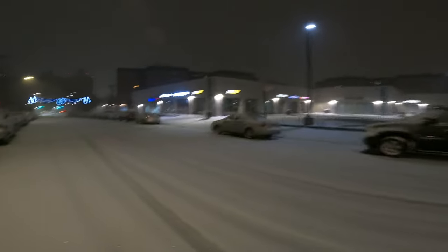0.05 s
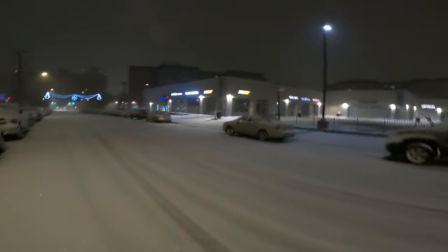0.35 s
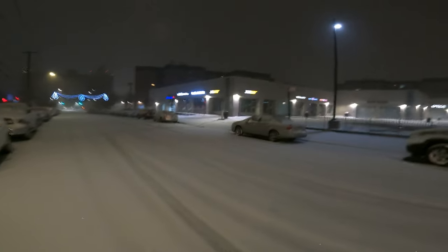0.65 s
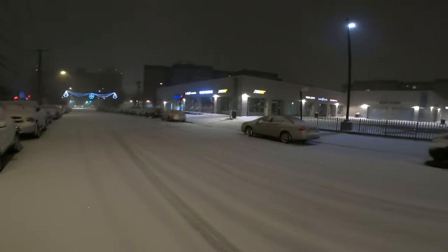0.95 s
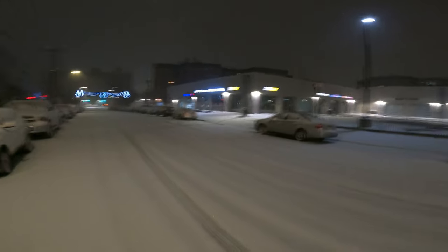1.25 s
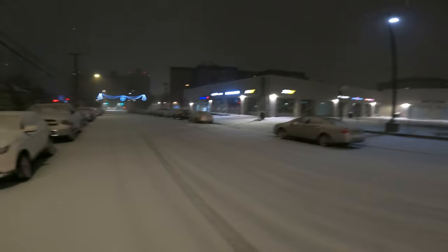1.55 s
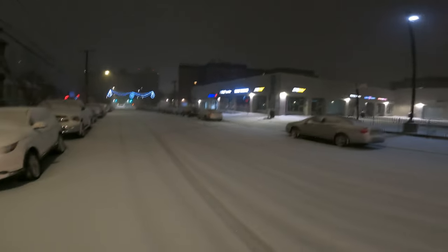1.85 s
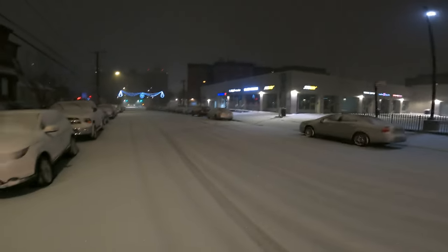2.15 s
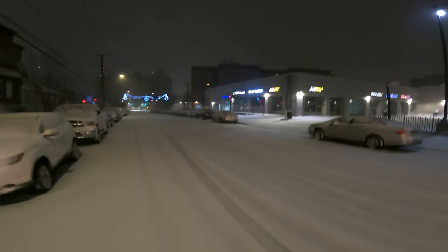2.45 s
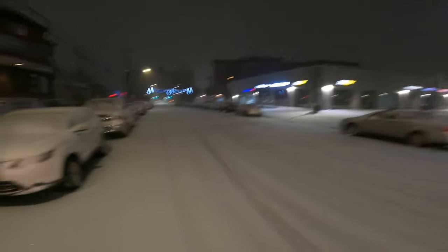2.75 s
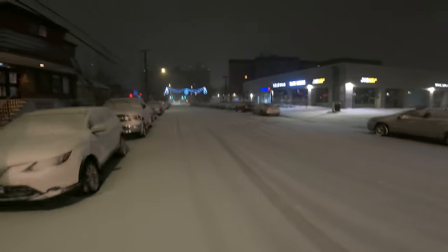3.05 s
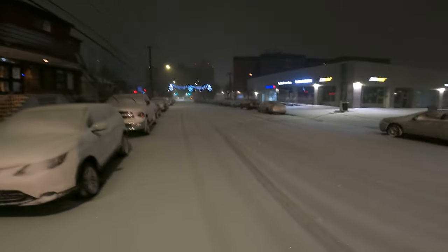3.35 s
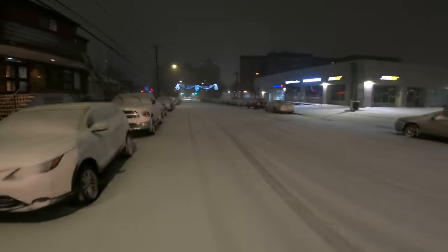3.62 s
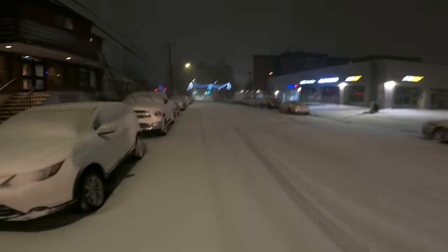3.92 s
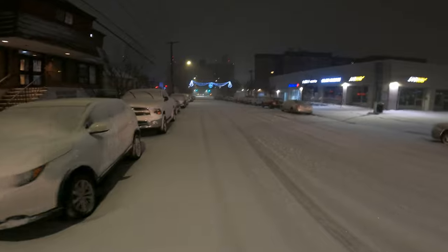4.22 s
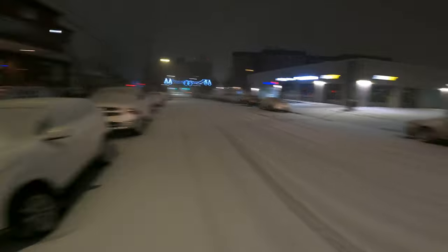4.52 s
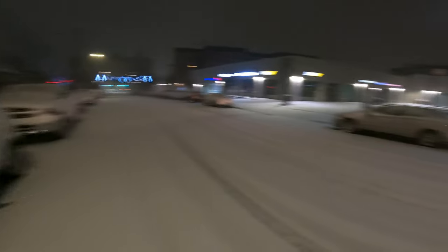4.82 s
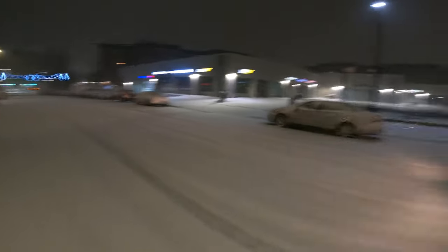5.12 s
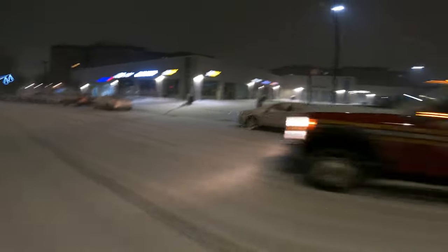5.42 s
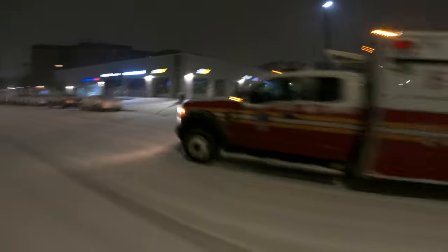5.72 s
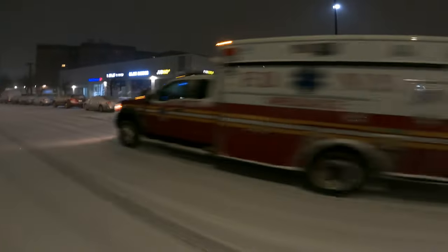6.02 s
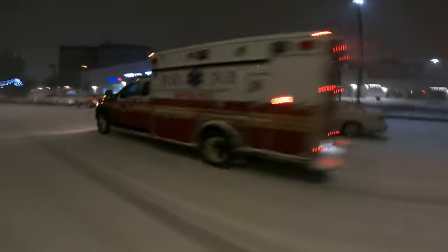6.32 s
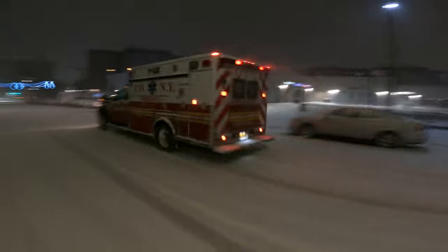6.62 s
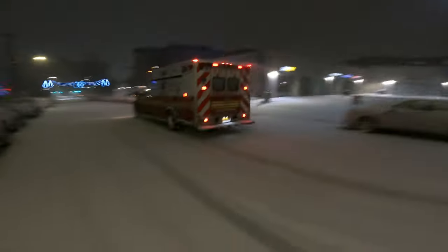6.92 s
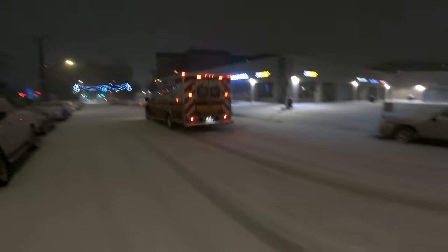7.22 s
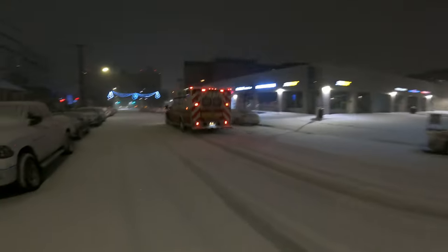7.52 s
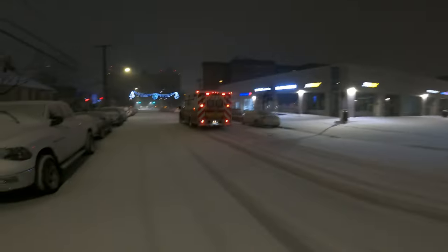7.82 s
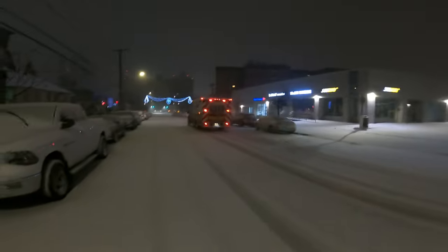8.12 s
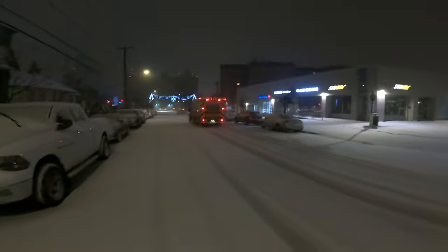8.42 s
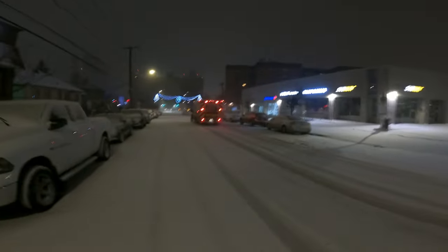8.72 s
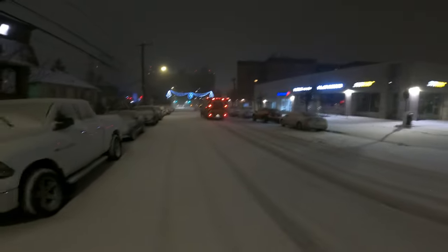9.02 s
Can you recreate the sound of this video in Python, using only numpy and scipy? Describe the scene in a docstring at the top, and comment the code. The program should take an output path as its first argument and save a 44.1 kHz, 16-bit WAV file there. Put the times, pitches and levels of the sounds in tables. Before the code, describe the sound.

An ambulance approaches along a snow-covered street, its diesel drone distant at first while the hand-held microphone is knocked and shifted. Engine hum, metallic rattle and the crunching hiss of tyres on snow build to a close pass, with a faint high whine. The sound then dulls and recedes, the exhaust booming a few more times. A low rumble of wind on the microphone runs throughout.

```python
"""A diesel engine drones in the distance, over a low rumble of air. It is an ambulance, which drives up
a snowy street, passes close to a hand-held camera and pulls away. Its firing cylinders make the exhaust
drone and the metal rattle, fan blades hum, a thin high whine flutters and the tyres crush the snow.
Before it arrives the camera is knocked and shifted in the hand, with dull bumps and small ticks."""
import sys
import numpy as np
from scipy import signal
from scipy.fft import rfft, irfft, next_fast_len
from scipy.io import wavfile
from scipy.ndimage import uniform_filter1d, map_coordinates

SR = 44100
rng = np.random.default_rng(int(sys.argv[2]) if len(sys.argv) > 2 else 0)


def dump(signal):
    """Clip the signal to [-1, 1] and save it as 16-bit WAV at the path in sys.argv[1]."""
    limited = np.clip(np.atleast_2d(signal).T, -1, 1)
    pcm = np.round(limited * 32767).astype(np.int16)
    wavfile.write(sys.argv[1], SR, pcm)


N = 408366

# Each _PASS table says how one sound drives by: (time alongside [s], level then [dB],
# closest distance [m], loss each time the distance doubles [dB], boost towards the rear [dB])
TONE_PASS = (5.85, -27, 5.2, 10.5, .3)
OCTAVE_PASS = (6, -37, 1, .6, 1.2)
GROWL_PASS = (5.4, -41, 5.5, 12.5, -2.5)
# the engine speeds up as it nears and eases off alongside (time [s], firing rate [Hz])
FIRING_RATE = [(0, 87), (.35, 81), (.7, 79), (1.5, 89), (2.3, 85.7), (3.7, 92.5), (4.2, 93.5), (4.8, 96.3),
               (5.45, 95.5), (6.25, 80.5), (7.05, 80), (8.2, 78.5), (9.26, 81.5)]
# the higher tones of the growl (multiple of the firing rate, level [dB])
GROWL_TONES = [(4, 0), (5, -5.5), (6, -7.5), (7, -4.5), (8, -10), (9, -11)]
# the exhaust note and its octave boom (time [s], level [dB], length [s])
TONE_BOOMS = [(1.4, -38.5, .1), (2.58, -33, .08), (4.83, -31, .07), (5.12, -29.5, .08), (5.7, -36, .05),
              (6.16, -30, .09), (6.6, -35, .15), (6.96, -31, .11), (7.92, -31, .07), (8.18, -24, .15),
              (8.55, -28, .14), (8.8, -28.5, .1)]
OCTAVE_BOOMS = [(.3, -49, .25), (1, -46, .3), (2.25, -40.5, .13), (3.55, -43, .16), (6.4, -39, .12),
                (6.9, -43, .25), (7.85, -37, .2), (8.65, -33, .19), (9.05, -42, .15)]
# the deep bass and the octave dip briefly (time [s], depth [dB], length [s])
BASS_DIPS = [(4.32, 3.5, 0.089), (7.71, 7, 0.053), (9, 1, 0.024)]
OCTAVE_DIPS = [(5.9, 8, 0.29)]
# the nose comes out into the open (time [s], loss while hidden [dB], fade [s])
NOSE_CLEARS = (4.76, 4.34, 0.049)
def exhaust(firing):
    """Firing cylinders make a low note, its octave and a growl; uneven firing adds weak extra tones."""
    def overtone(multiple):
        return amp(2.1 * wobble(8)) * np.sin(multiple * firing + rng.uniform(0, 2 * np.pi))
    tone_gain = (passing(*TONE_PASS) * screened(*NOSE_CLEARS) + swells(TONE_BOOMS)) * dips(BASS_DIPS)
    tone = tone_gain * amp(.5 * wobble(4.5)) * np.sin(firing)
    octave = amp(.78 * wobble(5.5)) * np.sin(2 * firing)
    uneven = amp(-21.5) * sum(overtone(k) for k in (1.5, 2.5, 3))
    drone = (passing(*OCTAVE_PASS) + swells(OCTAVE_BOOMS)) * dips(OCTAVE_DIPS) * (octave + uneven)
    growl = passing(*GROWL_PASS) * sum(amp(db) * overtone(k) for k, db in GROWL_TONES)
    return np.sqrt(2) * (tone + drone + growl)


# the tone colour of each tyre noise (frequency [Hz], level [dB])
ROAR_FRONT = [(180, -22.5), (300, -3.5), (400, -1.5), (520, -6), (680, -2.5), (900, -9.5), (1200, -10.5),
              (1550, -11), (1900, -23), (3000, -27.5)]
ROAR_REAR = [(180, -22.5), (300, -13), (400, -11), (520, 1), (700, 3.5), (950, 2), (1200, -1.5),
             (1550, -9.5), (1900, -16), (3000, -41)]
ROAR_FAR = [(180, -22), (300, -8.5), (360, 4.5), (500, 0.5), (680, -1.5), (850, -6), (1080, -4.5),
            (1400, -8), (1700, -28), (3000, -41)]
HISS_FRONT = [(940, -30), (1600, -4.5), (2050, -4), (2410, -8), (2720, -6), (3020, -10.5), (3380, -14.5),
              (5280, -20), (5980, -25), (6890, -25.5), (11300, -42.5), (13100, -44), (15400, -57)]
HISS_REAR = [(940, -21.5), (1600, -2.5), (1780, 0), (2030, -4.5), (2500, -4.5), (4460, -13), (5920, -20.5),
             (7160, -22), (8020, -24.5), (10200, -40), (11500, -42.5), (13000, -40.5), (14400, -47),
             (15400, -55.5)]
DRUMMING = [(200, -26), (320, -1), (450, -1.5), (650, -5), (900, -19), (1500, -45)]
TREAD = [(600, -26), (850, -0.5), (1050, 1), (1300, -8), (1700, -28)]
# how the roars and hisses drive by (columns as in TONE_PASS)
ROAR_FRONT_PASS = (5.5, -29.7, 4.5, 10.4, -3.6)
ROAR_REAR_PASS = (6, -35, 7.5, 11.5, 6.5)
ROAR_FAR_PASS = (6.5, -42, 7.5, 4.7, -1.9)
HISS_FRONT_PASS = (5.5, -42, 5.5, 12, -1.5)
HISS_REAR_PASS = (6.7, -44.3, 4.9, 8.8, -.4)
# the tyres drum over rougher snow, and sing while still far off (time [s], level [dB], length [s])
ROUGH_SNOW = [(4, -38, 0.19), (4.95, -35.3, 0.12)]
SINGING = [(3.2, -52, 0.48)]
# the front wheel comes out from behind the bumper (time [s], loss while hidden [dB], fade [s])
WHEEL_CLEARS = (5.03, 7, .04)
STREET_HISS_DB, CRACKS_PER_S = -61.5, 700
def tyres():
    """Snow roars and hisses under the wheels, and crunches as it gives way in tiny separate cracks."""
    roar = (passing(*ROAR_FRONT_PASS) * screened(*NOSE_CLEARS) * rush(ROAR_FRONT, patchy_db=1)
            + passing(*ROAR_REAR_PASS) * rush(ROAR_REAR, patchy_db=1.8)
            + passing(*ROAR_FAR_PASS) * rush(ROAR_FAR, patchy_db=1)  # duller, carries down the street
            + swells(ROUGH_SNOW) * rush(DRUMMING, patchy_db=1)
            + swells(SINGING) * rush(TREAD, patchy_db=2.7))
    front, rear = hiss_gains()
    hiss = front * rush(HISS_FRONT, patchy_db=1.9) + rear * rush(HISS_REAR, patchy_db=1.5)
    cracks = coloured(grains(CRACKS_PER_S), HISS_FRONT)
    crunch = amp(-9) * passing(*HISS_FRONT_PASS) * screened(*WHEEL_CLEARS) * cracks
    return amp(.51 * wobble(8.3)) * roar + amp(.29 * wobble(12)) * (hiss + crunch)


def hiss_gains():
    """How strongly the front wheels hiss (with the street's own hiss), and how strongly the rear do."""
    front = passing(*HISS_FRONT_PASS) * screened(*NOSE_CLEARS)
    return np.hypot(front, amp(STREET_HISS_DB)), passing(*HISS_REAR_PASS)


# the cooling fan's pitch climbs as it nears and sags as it goes by (time [s], blade rate [Hz])
FAN_PITCH = [(0, 170), (2.3, 172), (3.7, 185.4), (4.8, 192.6), (5.55, 196), (6.05, 194.5), (6.7, 189),
             (8.1, 189.5), (9.26, 195)]
# the first four blade tones (level [dB])
FAN_TONES = [0, -12, -18, -22]
# the hum swells as the grille faces the camera and goes by (time [s], level [dB], length [s])
FAN_SWELLS = [(3.7, -44, .22), (4.65, -36.5, .2), (5.49, -30, .06), (6.9, -44, .25)]
# how the fan drives by (columns as in TONE_PASS)
FAN_PASS = (6, -32.3, 7, 10.5, 1)
def fan():
    """Spinning blades hum, and swirling air roughens their tones."""
    blade = turning(curve(FAN_PITCH), waver=.011, rate=60)
    tones = sum(amp(db + 2.43 * wobble(11)) * np.sin(k * blade) for k, db in enumerate(FAN_TONES, 1))
    return np.sqrt(2) * (passing(*FAN_PASS) + swells(FAN_SWELLS)) * tones


# the tone colour of the body, the hollow hum and the exhaust gas (frequency [Hz], level [dB])
BODY = [(50, -34.5), (85, -18.5), (125, -3), (170, 4), (240, 0.5), (310, -7.5), (420, -14), (800, -51.5)]
HOLLOW = [(190, -41), (235, 5.5), (262, 1.5), (285, -0.5), (340, -41.5)]
GAS = [(35, -22.5), (62, 3), (85, -4), (135, 4), (210, -6), (300, -20), (500, -55.5)]
# the hum and the gas noise swell and fade (time [s], level [dB], length [s])
HUMS = [(3.85, -34.5, 0.17), (6.5, -35, 0.19)]
GAS_BLASTS = [(4.87, -24, 0.045), (5.7, -29.5, 0.55), (6.9, -34, 0.26)]
# how the body's boom drives by (columns as in TONE_PASS)
BODY_PASS = (6, -31.5, 10, 6, -2)
def rumble():
    """The vehicle's body and the street boom, with a hollow hum and the rush of exhaust gas."""
    body = passing(*BODY_PASS) * rush(BODY, patchy_db=1)
    hum = swells(HUMS) * rush(HOLLOW, patchy_db=2)
    gas = swells(GAS_BLASTS) * rush(GAS, patchy_db=2.1)
    return body + hum + gas


# the engine's metal rings differently from each side (pitch [Hz], width [Hz], level [dB])
ENGINE_BLOCK = [(2310, 330, 9), (2590, 330, 2.5), (2890, 190, 3.5), (3770, 780, -11), (4560, 460, -14.5)]
WHEEL_ARCH = [(2110, 90, 0), (2700, 200, 0)]
UNDERSIDE = [(970, 55, 10.5), (1130, 72, 3), (2000, 160, -13.5), (2600, 160, -8.5)]
# how the rattle at the front and underneath drives by (columns as in TONE_PASS)
CLATTER_PASS = (5.45, -41.3, 5, 12.4, -1.8)
UNDERSIDE_PASS = (6.5, -49, 7, 6, 0)
# the wheel arch faces the camera (time [s], level [dB], length [s])
ARCH_OPEN = [(5.55, -45, 0.1), (5.92, -45.5, 0.11)]
# the boxy body hides the engine, then uncovers the underside (time [s], loss while hidden [dB], fade [s])
ENGINE_HIDES = (6.07, 7.3, -0.032)
UNDERSIDE_CLEARS = (7.83, 16, .08)
def clatter(firing):
    """Each firing rattles the engine, heard through the grille, the wheel arch, then under the rear."""
    def blows(depth=.45):
        return rng.standard_normal(N) * np.exp(depth * np.cos(firing)) * amp(2.3 * wobble(90))
    front = passing(*CLATTER_PASS) * screened(*NOSE_CLEARS) * ringing(blows(), ENGINE_BLOCK)
    side = swells(ARCH_OPEN) * ringing(blows(), WHEEL_ARCH)
    rear = passing(*UNDERSIDE_PASS) * screened(*UNDERSIDE_CLEARS) * ringing(blows(), UNDERSIDE)
    return (front + side) * screened(*ENGINE_HIDES) + rear


# metal parts ring as the side goes by (time [s], level [dB], length [s], pitch [Hz])
METAL_RINGS = [(5.5, -43, .016, 2770), (5.545, -44, .016, 2620), (5.825, -41.5, .016, 2060),
               (5.872, -47, .012, 2030), (5.92, -48, .014, 2950), (5.975, -47, .022, 2620),
               (5.98, -49, .03, 2800)]
def metal_rings():
    """Short, slightly unsteady tones of ringing metal stand out of the clatter."""
    return np.sqrt(2) * sum(swells([(s, db, length)]) * np.sin(turning(hz, waver=.005, rate=150))
                            for s, db, length, hz in METAL_RINGS)


# a high whine from the engine (time [s], pitch [Hz])
WHINE_PITCH = [(4.2, 6900), (4.9, 7110), (5.25, 7130), (6, 7080), (6.15, 6940), (6.6, 7030), (7.1, 6970),
               (7.6, 6990), (7.95, 6930), (8.8, 7090)]
# its tones, all harmonics of one lower note (multiple of the whine's pitch, level [dB])
WHINE_TONES = [(.9, -16), (1, 0), (1.1, -18), (1.2, -17), (1.4, -27)]
# it flares briefly (time [s], level [dB], length [s])
WHINE_FLARES = [(4.8, -74, .04), (5.2, -62, .018), (5.28, -58.5, .022), (5.57, -63, .09),
                (6.38, -67.5, .06), (7.4, -75, .16), (7.92, -76.5, .07)]
# how it drives by (columns as in TONE_PASS)
WHINE_PASS = (5.9, -73, 4.5, 7, 2.5)
def whine():
    """A thin, fluttering high whine, with faint tones from the same harmonic series."""
    phase = turning(curve(WHINE_PITCH), waver=.005, rate=220)
    flutter = amp(-1.5 + 3.5 * wobble(35))
    tones = flutter * sum(amp(db) * np.sin(k * phase) for k, db in WHINE_TONES)
    return np.sqrt(2) * (passing(*WHINE_PASS) * screened(*NOSE_CLEARS) + swells(WHINE_FLARES)) * tones


# snow flung sideways, then trailing behind (columns as in TONE_PASS)
SPRAY_PASSES = [(5.4, -49.5, 2.4, 13, 0.94), (7.3, -67.5, 4.3, 10, .9)]
# the tone colour of flying snow (frequency [Hz], level [dB])
SPRAY = [(2000, -25.5), (3900, 6), (5200, 5.5), (6500, -9.5), (8500, -10), (10500, -30), (11700, -33),
         (13000, -24.5), (15400, -40)]
SIZZLE = [(7000, -30), (8500, -3), (10000, -12), (11500, -18), (12200, 2), (13200, 0), (14500, -6),
          (15400, -18)]
# fine snow sizzles off the front tyre (time [s], level [dB], length [s])
SIZZLE_SWELLS = [(5.24, -75, .08), (5.5, -76, .11)]
def snow_spray():
    """Loose snow sprays from the wheels, with a fine sizzle when the front tyre is nearest."""
    gain = sum(passing(*row) for row in SPRAY_PASSES) * screened(*WHEEL_CLEARS) * amp(1.2 * wobble(15))
    return gain * rush(SPRAY, patchy_db=3) + swells(SIZZLE_SWELLS) * rush(SIZZLE, patchy_db=3)


# knocks on the camera
# (time [s], ring level [dB], pitch [Hz], ring length [s], scrape level [dB], scrape length [s])
KNOCKS = [(0.5515, -33.5, 790, 0.03, -62, 0.06), (1.5274, -25.5, 925, 0.012, -59, 0.024),
          (1.564, -27.5, 1400, 0.013, -50, 0.032), (1.5692, -7.5, 254, 0.019, -44, 0.049),
          (1.584, -47, 5300, 0.012, -46, 0.068), (2.3171, -14.5, 194, 0.014, -41, 0.01),
          (3.039, -31, 4100, 0.0035, -44.5, 0.007), (3.0398, -34, 5230, 0.0032, -51, .005),
          (3.042, -7, 123, 0.03, -60, .02)]
# the tone colour of a scrape (frequency [Hz], level [dB])
SCRAPE = [(300, -11), (900, 2), (2200, -0.5), (2750, -4.5), (3500, -6.5), (4200, -9), (5400, -13),
          (8000, -22.5), (12500, -33.5), (15000, -50)]
# a sleeve rustles (time [s], level [dB], length [s])
RUSTLES = [(.08, -57, 0.058), (.56, -58.5, 0.028), (1.03, -57, 0.046), (1.2, -59, 0.063),
           (1.62, -59.5, 0.13), (2.33, -58.5, 0.11), (3.05, -60, 0.11), (9.07, -68, 0.012)]
def knocks():
    """Each knock makes the camera's case ring and scrape briefly; a sleeve rustles softly."""
    out = np.zeros(N)
    scrape = coloured(rng.standard_normal(N), SCRAPE)
    t = np.arange(SR // 6) / SR
    for s, db, hz, ring_s, scrape_db, scrape_s in KNOCKS:
        span = slice(round(s * SR), round(s * SR) + len(t))
        rise = 1 - np.exp(-hz * t / .2)  # takes about a fifth of a cycle
        ring = amp(db - 60 * t / ring_s) * np.sin(2 * np.pi * hz * t) * rise
        out[span] += ring + amp(scrape_db - 60 * t / scrape_s) * scrape[span]
    return out + swells(RUSTLES) * scrape


# the plastic case snaps under a knock (time [s], level [dB])
SNAPS = [(1.5685, -34), (1.583, -32), (1.5858, -29.5)]
# the case's own tones (pitch [Hz], level [dB], time to fade by 60 dB [s])
CASE_TONES = [(1500, -8, .012), (2000, -6, .018), (2315, -5, .02), (3440, -7, .016), (5060, -20, .025)]
def snaps(rise_s=.0004):
    """Each snap sets all the tones of the plastic case ringing."""
    out = np.zeros(N)
    t = np.arange(SR // 10) / SR
    for s, db in SNAPS:
        ring = sum(amp(level - 60 * t / fade_s) * np.sin(2 * np.pi * hz * t + rng.uniform(0, 2 * np.pi))
                   for hz, level, fade_s in CASE_TONES)
        out[round(s * SR):][:len(t)] += amp(db) * ring * (1 - np.exp(-t / rise_s))
    return out


# the hand bumps the case (time [s], level [dB], length [s])
BUMPS = [(2.525, -21, .028), (2.66, -22, .032), (2.74, -23, .028), (2.82, -25, .035), (3.052, -23, .022)]
# ticks by the left microphone (time [s], relative level [dB], left minus right [dB], crispness [dB])
TICKS = [(2.288, -52.5, 12, -12), (2.3168, -34.5, 15.5, -13.5), (2.321, -47, 12, -24), (2.42, -43, 10, -19),
         (2.4925, -58, 11, -9), (2.694, -56, 18, -13), (2.749, -53, 22, -10), (2.84, -49, 18, -8),
         (2.954, -54, -7, -9), (3.0481, -32.5, 13, -5), (3.0588, -43, 22, -10), (3.0627, -46, 13, -14),
         (3.0738, -49.5, 13, -12), (3.3604, -51, 10, -14), (3.427, -61, 8, -1), (3.8302, -61, 8, 0),
         (3.95, -50, 8, -3.5), (4.3262, -55, 5, -1), (4.5718, -54, 4, -1), (6.53, -51, 0, -9),
         (7.5912, -53, 3, -10)]
# the tone colour of a bump and of a tick's two parts (frequency [Hz], level [dB])
BUMP_COLOUR = [(20, -8), (40, 4.5), (75, 2), (130, -3), (220, -17.5), (400, -23.5), (900, -70)]
TICK_BRIGHT = [(2000, -34), (4500, -20), (6300, -13), (7900, 3.5), (9500, -9), (11500, -20), (15000, -41)]
TICK_CRISP = [(8000, -31.5), (10500, -6.5), (12400, 0), (13600, -5.5), (15400, -18)]
def grip(tick_fade_s=.0065):
    """Fingers shift on the case: dull bumps and tiny bright ticks, some crisper than others."""
    out = panned(swells(BUMPS) * rush(BUMP_COLOUR, patchy_db=2.5), pan_db=-7.5)
    bright = coloured(rng.standard_normal(N), TICK_BRIGHT)
    crisp = coloured(rng.standard_normal(N), TICK_CRISP)
    t = np.arange(SR // 30) / SR
    for s, db, pan_db, crisp_db in TICKS:
        span = slice(round(s * SR), round(s * SR) + len(t))
        tick = bright[span] + amp(crisp_db) * crisp[span]
        out[:, span] += panned(amp(db - 7.5 - 60 * t / tick_fade_s) * tick, pan_db)
    return out


# the fingers rub faintly between the ticks (time [s], level [dB], length [s])
CREAKS = [(2.33, -79, 0.075), (2.78, -80, 0.13), (3.05, -70, 0.029)]
def creak():
    """Skin slides on the case in many tiny, bright slips."""
    slips = grains(per_s=2500)
    rub = coloured(slips, TICK_BRIGHT) + amp(-9) * coloured(slips, TICK_CRISP)
    return panned(swells(CREAKS) * rub, pan_db=12)


# the tone colour of wind on the microphone (frequency [Hz], level [dB])
AIR = [(10, -16.5), (22, 0.5), (45, 0.5), (70, 2.5), (110, -2.5), (170, -18.5), (300, -27.5), (600, -69.5)]
# the deep bass rumble swells (time [s], level [dB], length [s])
BASS_SWELLS = [(4.1, -31.5, 0.11), (4.92, -27, 0.14), (7, -26, 0.078), (8.15, -28.5, 0.15),
               (8.58, -30.5, 0.1)]
# how the air dragged along by the vehicle goes by (columns as in TONE_PASS)
WAKE_PASS = (5.75, -24.6, 5.5, 14.7, .8)
def air(breeze_db=-32.5):
    """A breeze and the air behind the vehicle rumble on the microphone; the deep bass swells and dips."""
    gain = np.hypot(amp(breeze_db), passing(*WAKE_PASS)) + swells(BASS_SWELLS)
    return gain * dips(BASS_DIPS) * amp(.17 * wobble(12)) * rush(AIR, patchy_db=.25)


# the background noise is slightly wide, then the camera switches to near mono (time [s], level [dB])
WIDTH = [(0, -68), (1.5, -66.5), (3.1, -54), (3.4, -59.5), (4.2, -100)]
# the tone colour of that noise and of fizzing snow (frequency [Hz], level [dB])
BACKGROUND = [(200, -3), (400, 3.5), (1000, -0.5), (2700, -7.5), (4000, -14), (6000, -19.5), (8000, -21),
              (10000, -29), (12500, -31.5), (15000, -45)]
FIZZ = [(1500, -25.5), (4000, -8), (6000, -5), (8000, -9.5), (10500, -18), (12500, 2.5), (15000, -14)]
def stereo_width():
    """What differs between the ears: background noise at first, later a trace of snow hiss."""
    background = rush(BACKGROUND, patchy_db=4) + amp(13.5) * rush(AIR, patchy_db=3)
    fizz = amp(-31) * np.hypot(*hiss_gains()) * rush(FIZZ, patchy_db=11.5)
    return amp(curve(WIDTH)) * background + fizz + amp(-25.5) * snow_spray()


SPEED_M_PER_S = 7.22
def passing(s, db, closest_m, loss_db, rear_db):
    """Gain of a source that drives by: it falls with distance and differs between front and rear."""
    past_m = SPEED_M_PER_S * (clock() - s)
    distance_m = np.hypot(past_m, closest_m)
    direction = past_m / distance_m  # -1 coming, 1 going
    return amp(db - loss_db * np.log2(distance_m / closest_m) + rear_db * direction)


def screened(s, loss_db, fade_s):
    """Gain of a source coming out from behind something; a negative fade hides it instead."""
    return amp(-loss_db * (1 - np.tanh((clock() - s) / (2 * fade_s))) / 2)


def bell(s, length):
    """A smooth hump, 1 at time s and about 0.6 at one length either side."""
    return np.exp(-.5 * ((clock() - s) / length) ** 2)


def swells(rows):
    """A smooth rise and fall for each (time, level, length) row."""
    return sum(amp(db) * bell(s, length) for s, db, length in rows)


def dips(rows):
    """A smooth drop in gain for each (time, depth, length) row."""
    return amp(-sum(db * bell(s, length) for s, db, length in rows))


def turning(hz, waver, rate):
    """The angle of something spinning at a slightly unsteady speed."""
    return 2 * np.pi * np.cumsum(hz * (1 + waver * wobble(rate))) / SR


def wobble(rate):
    """A smooth curve through `rate` random points a second."""
    positions = np.linspace(0, N * rate / SR, N // 32)
    smooth = map_coordinates(rng.standard_normal(int(positions[-1]) + 4), [positions])
    return np.interp(clock() * rate, positions, smooth)


def grains(per_s):
    """Tiny clicks of random size at random times."""
    return (rng.random(N) < per_s / SR) * rng.standard_normal(N)


def rush(colour, patchy_db):
    """Noise of a given tone colour, with drifting louder and softer patches."""
    bands = signal.stft(rng.standard_normal(N), nperseg=512)[2]
    patches = uniform_filter1d(rng.standard_normal(bands.shape), size=5, axis=0)  # smooth over pitch
    patches = uniform_filter1d(patches, size=12, axis=1)  # and over time
    noise = signal.istft(bands * amp(patchy_db * unit(patches)), nperseg=512)[1][:N]
    return coloured(noise, colour)


def ringing(x, resonances):
    """Ring x through metal with (pitch, width, level) peaks and dull top treble, at strength 1."""
    def metal(f):
        peaks = sum(amp(db) * 1j * f * width / (hz * hz - f * f + 1j * f * width)
                    for hz, width, db in resonances)
        return peaks * np.exp(-(f / 7000) ** 2)
    return unit(filtered(x, metal))


def coloured(x, colour):
    """Shape x by (frequency, level) points, cut off above the last, at strength 1."""
    f, db = np.transpose(colour)
    return unit(filtered(x, lambda hz: amp(np.interp(np.log(hz + 1), np.log(f), db, right=-120))))


def filtered(x, response):
    """Turn each frequency of x up or down by response(frequency)."""
    size = next_fast_len(N + SR // 2)
    return irfft(rfft(x, size) * response(np.fft.rfftfreq(size, 1 / SR)), size)[..., :N]


def panned(x, pan_db):
    """Place a sound by making it pan_db louder on the left than on the right."""
    return np.array([x * amp(pan_db / 2), x * amp(-pan_db / 2)])


def curve(rows):
    """Join (time, value) points with straight lines."""
    return np.interp(clock(), *np.transpose(rows))


def clock():
    """The time of each sample in seconds."""
    return np.arange(N) / SR


def amp(db):
    """Turn decibels into a gain, a number to multiply by."""
    return 10 ** (np.asarray(db) / 20)


def unit(x):
    """Scale to an average strength (rms) of 1."""
    return x / np.sqrt(np.mean(x ** 2) + 1e-20)


def scene():
    """Mix left and right: the background is slightly wide, then the camera switches to near mono."""
    firing = turning(curve(FIRING_RATE), waver=.005, rate=20)
    engine = exhaust(firing) + clatter(firing) + metal_rings() + fan() + whine()
    vehicle = engine + rumble() + tyres() + snow_spray()
    middle = vehicle + air() + knocks() + snaps()
    side = stereo_width() + amp(-12.5) * knocks()
    return np.array([middle + side, middle - side]) + grip() + creak()


FADE_IN_S, TOP_HZ = .004, 15600
def record(dry):
    """The sound fades in over a few milliseconds, and the very highest treble is cut off."""
    return filtered(dry * np.minimum(clock() / FADE_IN_S, 1), lambda hz: hz < TOP_HZ)


dry = scene()
out = record(dry)
dump(out)
```